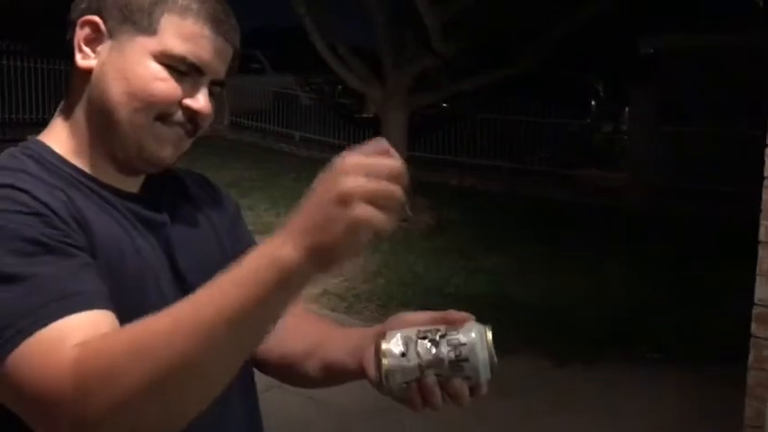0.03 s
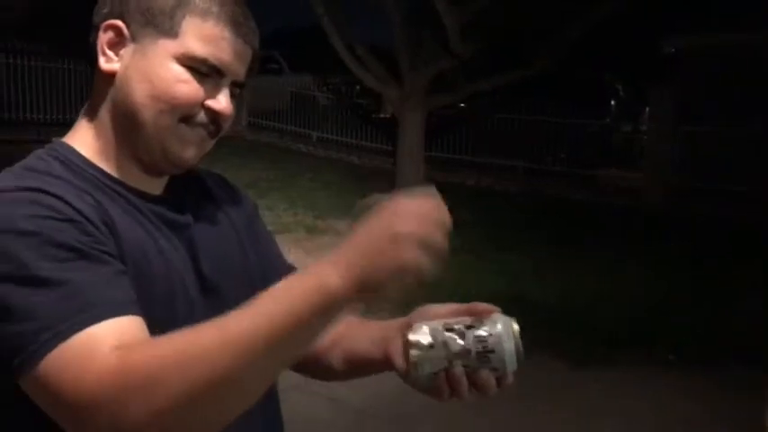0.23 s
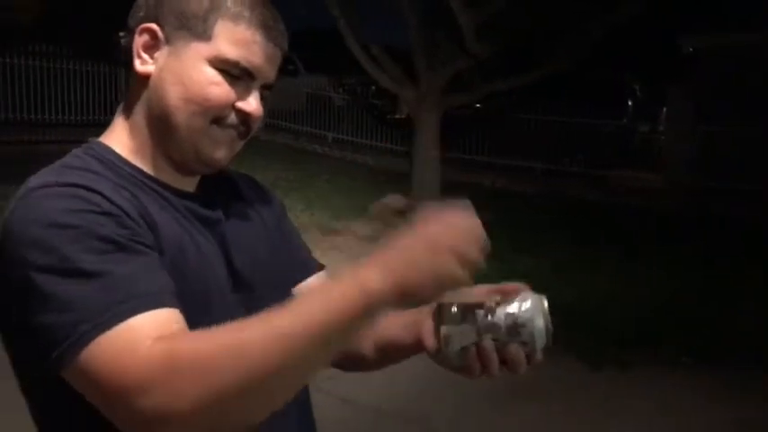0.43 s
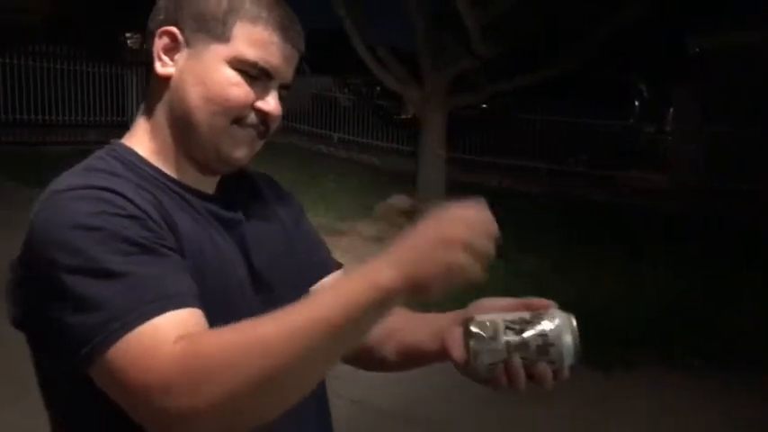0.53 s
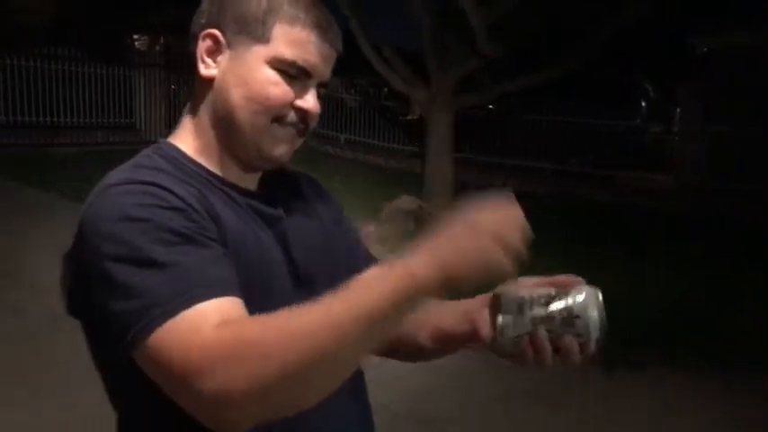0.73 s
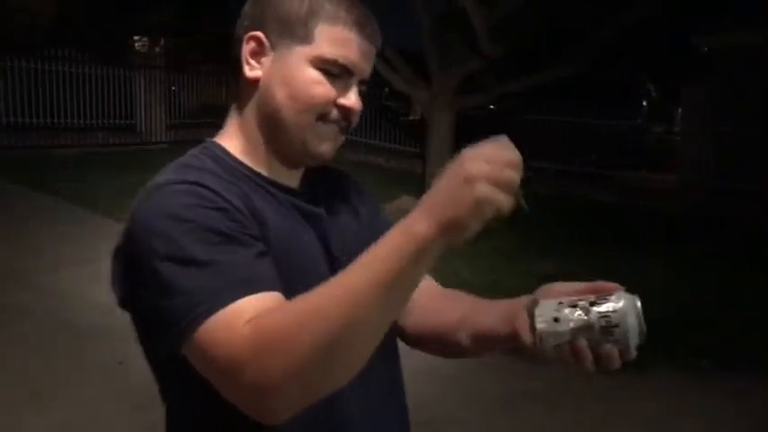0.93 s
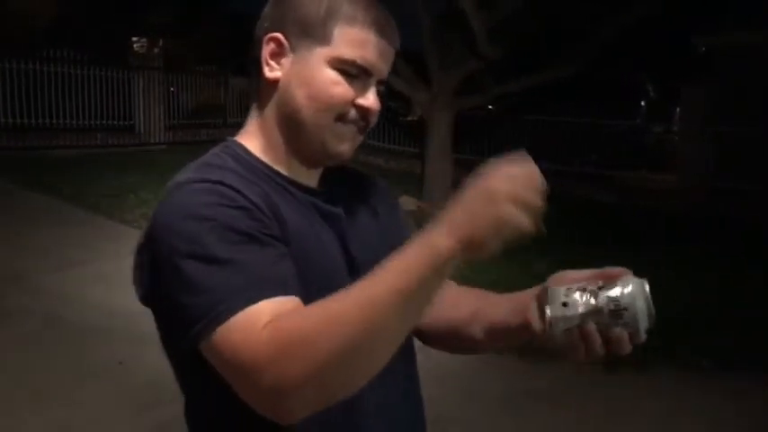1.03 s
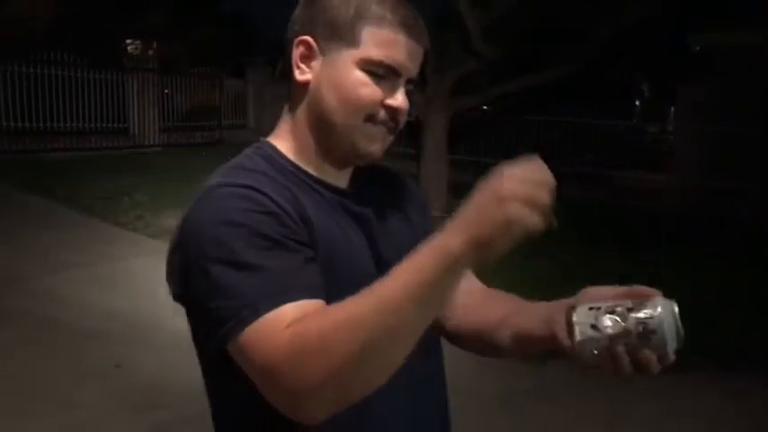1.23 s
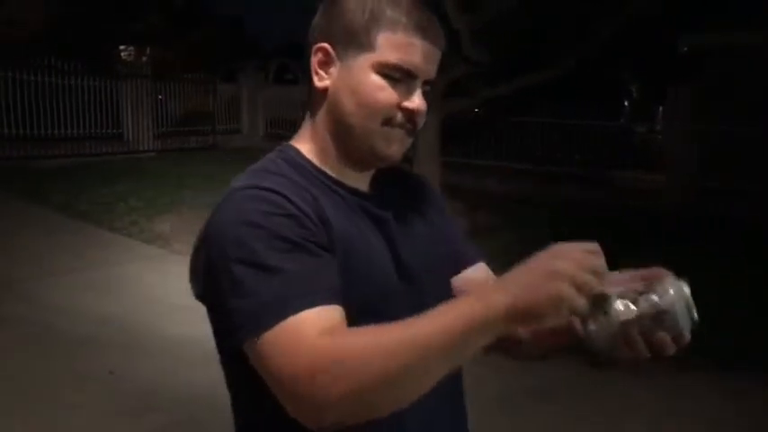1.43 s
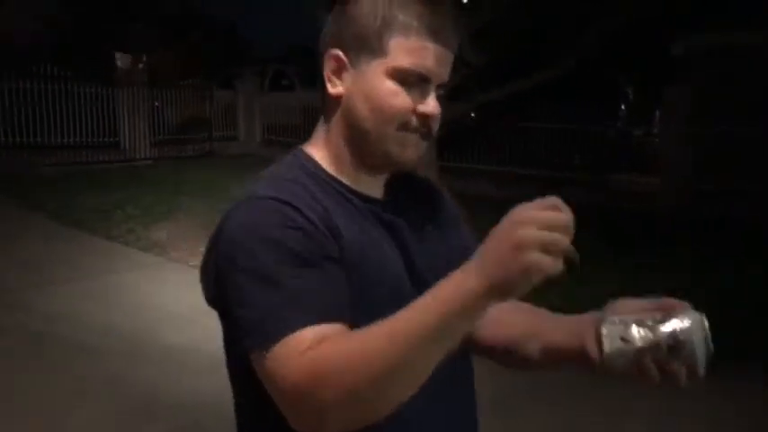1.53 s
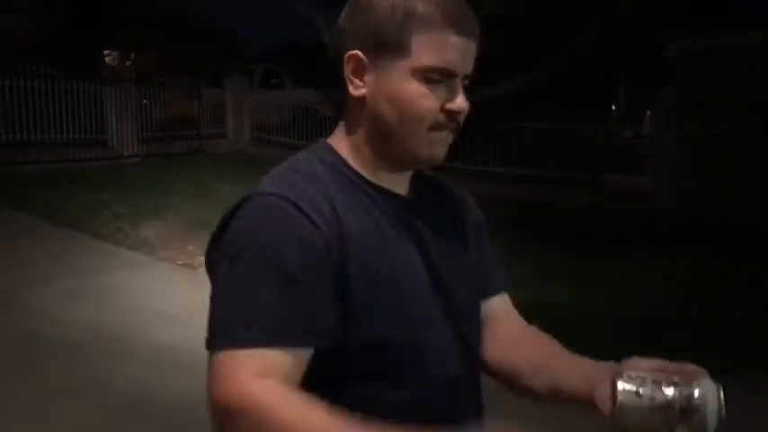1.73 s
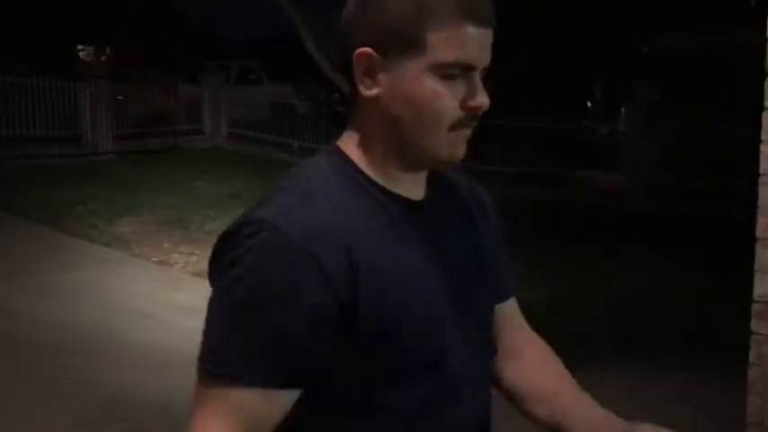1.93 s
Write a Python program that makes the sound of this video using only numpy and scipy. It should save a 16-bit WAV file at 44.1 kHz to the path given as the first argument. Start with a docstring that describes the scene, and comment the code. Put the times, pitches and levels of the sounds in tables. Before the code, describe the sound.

A fist hits an empty aluminium can five times with sharp, crunching metallic cracks.

```python
"""A low, distant hum fills a yard at night, and skin rubs on an empty aluminium can held in one hand.
The other fist strikes the can five times, four of them with a dull thud. Each blow buckles the thin
wall in a quick run of snaps that set it ringing, and the dents pop back as the fist lifts.
The yard adds a short echo. The hand shifts before the fifth blow; after it, one last dent clicks
out alone, and the hand shifts faintly once more."""
import sys
import numpy as np
from scipy import signal
from scipy.fft import rfft, irfft
from scipy.io import wavfile
from scipy.ndimage import uniform_filter1d

SR = 44100
rng = np.random.default_rng(int(sys.argv[2]) if len(sys.argv) > 2 else 0)


def master(y):
    """Save y as 16-bit WAV."""
    cut = np.clip(np.atleast_2d(y).T, -1, 1)
    pcm = np.round(cut * 32767)  # scale
    wavfile.write(sys.argv[1], SR, pcm.astype(np.int16))


N = 88200

# Colour of the night air: f/Hz, relative level/dB
AIR_COLOUR = [(15, -60), (27, -30), (44, -6), (65, 0), (105, -1), (160, -6), (300, -13), (450, -18),
              (760, -18), (1400, -26), (2000, -30.5), (3700, -35.5), (7000, -37.5), (9000, -41),
              (14000, -42.5), (16000, -47)]
# Tones of the distant hum: f/Hz, level/dB
HUM_TONES = [(59.2, -57.5), (76, -62), (97.5, -51.5), (120, -59.5), (182, -61.5), (245, -66), (301, -68.5)]
# The hand shifts on the can: t/s, length/s, level/dB
SKIN_RUBS = [(0.0, 0.043, -55.5), (1.413, 0.062, -49), (1.887, 0.061, -70.5)]
# The fist lands: t/s, level/dB, centre f/Hz
FIST_THUDS = [(0.205, -33.5, 241.7), (.840, -25.5, 597), (1.167, -31.5, 445), (1.477, -26, 499)]
# One row per buckle of the wall: t/s, level/dB, fade time/s, shimmer/dB, body/dB, treble/dB,
# the dent's low note f/Hz, its level/dB, its high note f/Hz, its level/dB, bite around that note/dB
WALL_BUCKLES = [ (0.2056, -14, 0.00977, -6.5, 1.5, -1.5, 735, -9.5, 3200, -16, 6),
                (.2115, -16, 0.0066, -12, 5.5, 0.5, 1094, -11.5, 2720, -6.5, -22),
                (0.22, -22, 0.0031, -17.5, 9, -1.5, 1420, -8, 3080, -11, 2),
                (.2280, -18, 0.0078, -17, 11, 1, 1841, 4, 3086, -1, -4),
                (.2405, -29, 0.0024, -24, 0, -9, 1301, 10, 3750, -12, 11),
                (0.2533, -23.5, 0.0027, -18, 5, 6, 930, -4, 3020, -1, 2),
                (.2590, -14, 0.0049, -18.5, -2, 3, 1666, -11, 3546, -2.5, 5),
                (0.5399, -17.5, 0.0063, -11, 4.5, -6, 775, -12, 2180, -21, -2.5),
                (.5440, -11.5, 0.0067, -11, -3, -4.5, 1445, -10, 3088, -8.5, -6),
                (0.575, -35.5, 0.0071, 5, 10, -3.5, 1020, -13, 3670, -8, -4.5),
                (.5860, -15, 0.0034, -21.5, -7, -2, 1825, 0, 3160, -6, 7),
                (.5885, -17.5, 0.0029, -9.5, 0, 5.5, 1630, -7, 3650, 2, 8),
                (0.604, -36, 0.0076, -10.5, 1.5, 6, 1900, 2, 5570, 8.5, -1.5),
                (0.8396, -15.5, 0.0079, -17, 6, 2.5, 754, -3, 3530, -19, 4),
                (.8420, -20, 0.0041, -6.5, 5.5, 4.5, 1422, 3, 4360, -5.5, 2.5),
                (.8510, -13, 0.0077, -4.5, -10, -3, 1795, -14, 3070, -7, -6),
                (.8590, -17.5, 0.007, -15, -0.5, -10, 1683, -1.5, 3260, -7, 3.5),
                (0.8874, -23, 0.0024, -18, 0, -8.5, 803, -1.5, 3960, -8, 5),
                (.8980, -25.5, 0.009, -16, 10.5, 1, 720.8, 2, 4200, -19.5, 11.5),
                (.9085, -17.5, 0.0057, -4.5, -3.5, 0, 1017, -8, 4507, -6, 1),
                (0.9143, -19.5, 0.0063, -17, -2.5, -3.5, 852, -1, 3180, -23.5, -5),
                (1.1666, -11, 0.0059, -0.5, 0, -2, 1057, -8.5, 4000, -4.5, -0.5),
                (1.1813, -18, 0.017, -12.5, 0, -11.5, 1773, 2, 3136, -6, -6),
                (1.2208, -17, 0.0024, -12, -9, 5, 822, -7.5, 4070, -17, 1),
                (1.2368, -21.5, 0.0069, -22, -4.5, -3.5, 824.4, -14, 4655, -4.5, 12.5),
                (1.2439, -26, 0.0069, -22, -6, -4.5, 1091, -15.5, 4040, -9, 0),
                (1.4767, -15, .006, -9, -4, 5, 812, -10, 4502, 1, 5.5),
                (1.4815, -18.5, 0.0026, 1.5, 10.5, 1.5, 1320, -30.5, 3142, -6, 14.5),
                (1.4925, -15, 0.0092, 0, -5.5, -6, 1368, 1, 4440, -4.5, -3),
                (1.524, -16, 0.0013, -11, 2.5, 1.5, 861, -1.5, 4290, -21, 11),
                (1.5386, -27.5, 0.0075, -10, -1, 7.5, 803, -0.5, 4090, 3.5, 3),
                (1.5505, -31.5, 0.0068, -23.5, 3.5, -25.5, 3390, 7.5, 4510, -19.5, 9),
                (1.5603, -33.5, 0.0026, -21, -17, 3.5, 3380, -18, 4283, 1, 21.5)]
# Colour of a snap: f/Hz, relative level/dB
SNAP_COLOUR = [(100, -35), (300, -32.5), (430, -16.5), (600, -12), (745, 1), (1100, 1), (1800, 3),
               (2350, 0), (3200, 4), (4300, 1), (5100, -2), (5700, 1), (7000, -1.5), (10300, -5),
               (12500, -3), (16000, -7.5)]
# Notes the can rings at: f/Hz, relative level/dB, ring time/s (the time to fade by 60 dB)
CAN_NOTES = [(554.6, -22.5, 0.098), (762, -10, 0.1), (847, -20, 0.16), (1006, -24, 0.225),
             (1100, -7.5, 0.069), (1340, -12.5, 0.053), (1684, -15, 0.099), (1838, -18, 0.12),
             (2820, -27.5, .1), (2940, -27.5, 0.079), (3220, -11, 0.065), (3400, -18, 0.098),
             (3690, -13.5, 0.08), (4030, -11, 0.097), (4540, -21, 0.052), (5480, -15, .11),
             (5750, -13.5, .11)]
# How long the yard echoes at each pitch: f/Hz, ring time/s
YARD_FADES = [(300, 0.16), (900, 0.16), (2000, 0.23), (4500, 0.18), (9000, 0.21), (15000, 0.12)]
# Notes of the last dent: f/Hz, relative level/dB, ring time/s
CLICK_NOTES = [(961.3, -20.5, 0.065), (1426, -21, .015), (1735, -19, 0.038), (2230, -25, 0.041),
               (3425, -6.5, .025), (3950, 0, 0.013), (4800, -7, 0.012), (6150, -8, .012),
               (6840, -1.5, 0.008), (8560, -20, 0.0104)]


def amp(db):
    """Turns decibels into a number to multiply a sound by."""
    return 10 ** (np.asarray(db) / 20)


def evened(x):
    """Scales a signal to an average power of 1."""
    return x / np.sqrt(np.mean(x ** 2) + 1e-20)


def read(points, hz):
    """Reads between the rows of a table, with pitch spaced in octaves."""
    f, value = np.transpose(points)
    return np.interp(np.log(hz + 1), np.log(f + 1), value)


def add(mix, start_s, sound):
    """Mixes a sound in at its start time."""
    part = mix[max(round(start_s * SR), 0):][:len(sound)]
    part += sound[:len(part)]


def band_noise(edges_hz, size):
    """Noise of power 1 between two frequencies."""
    band = signal.butter(2, edges_hz, "band", fs=SR, output="sos")
    return evened(signal.sosfilt(band, rng.standard_normal(size)))


def coloured(x, db):
    """Turns each frequency up or down by db, without smearing the sound back in time."""
    log_gain = np.log(amp(np.r_[db, db[-2:0:-1]]))
    return irfft(rfft(x) * np.exp(np.conj(signal.hilbert(log_gain)))[:len(db)])


def night_air(level_db=-49.5, flicker_db=2):
    """Distant rumble and faint hiss, flickering a little in patches of pitch and time."""
    frames, hz = N // 512 + 5, np.fft.rfftfreq(2048, 1 / SR)
    real, imag, patches = rng.standard_normal((3, len(hz), frames))
    patches = evened(uniform_filter1d(uniform_filter1d(patches, size=16, axis=0), size=8, axis=1))
    spectrum = (real + 1j * imag) * amp(read(AIR_COLOUR, hz)[:, None] + flicker_db * patches)
    return amp(level_db) * evened(signal.istft(spectrum, nperseg=2048, noverlap=1536)[1][:N])


def distant_hum(waver=.71, waver_hz=7.3):
    """Low tones, each made to waver by noise close to its own pitch."""
    out, t = np.zeros(N), np.arange(N) / SR
    for hz, db in HUM_TONES:
        tone = np.sin(2 * np.pi * (hz * t + rng.random()))
        out += amp(db) * evened(tone + waver * band_noise((hz - waver_hz, hz + waver_hz), N))
    return out


def skin_rubs(band_hz=(1775, 4760)):
    """Skin slides on the can with a soft, brief hiss."""
    out = np.zeros(N)
    for start_s, length_s, db in SKIN_RUBS:
        swell = signal.windows.tukey(int(length_s * SR), .5)
        add(out, start_s, amp(db) * swell * band_noise(band_hz, len(swell)))
    return out


def fist_thuds(peak_s=.0045, spread=1.15):
    """The dull push of the fist: low noise that swells fast and dies away."""
    out, t = np.zeros(N), np.arange(SR // 10) / SR
    swell = t / peak_s * np.exp(1 - t / peak_s)
    for start_s, db, hz in FIST_THUDS:
        add(out, start_s, amp(db) * swell * band_noise((hz / spread, hz * spread), len(t)))
    return out


def snap_run(t, fade_s, shimmer_db, snaps_per_s=1400, spread_db=3):
    """A dying run of snaps crosses the wall; a crowd of high notes shimmers on after each."""
    snap_s, shimmer_s, rise_s = .001, .013, .0007
    size, fade = len(t), np.exp(-t / fade_s)
    happens = rng.random(size) < snaps_per_s / SR
    snaps = happens * amp(spread_db * np.clip(rng.standard_normal(size), -2, 2))
    snaps[0] = amp(spread_db)
    one_snap = np.exp(-2 * t / snap_s) / snap_s
    shimmer = amp(shimmer_db) ** 2 * np.exp(-2 * t / shimmer_s) / shimmer_s
    power = abs(signal.fftconvolve((snaps * fade) ** 2, one_snap + shimmer)[:size])
    crack = np.sqrt(power) * (1 - np.exp(-t / rise_s)) * rng.standard_normal(size)
    return evened(crack) * np.sqrt(np.mean(fade ** 2))


def ringing(notes, t, blur_share=.014, blur_at_hz=1500):
    """Dying notes whose pitch trembles as the thin wall keeps shifting."""
    out = np.zeros(len(t))
    for hz, db, ring_s in notes:
        blur_hz = hz * blur_share * min(hz / blur_at_hz, 2)  # low notes ring cleaner
        drift = np.cumsum(rng.standard_normal(len(t))) * np.sqrt(2 * np.pi * blur_hz / SR)
        drift = uniform_filter1d(drift, size=130)
        out += amp(db - 60 * t / ring_s) * np.sin(2 * np.pi * (hz * t + rng.random()) + drift)
    return out


def buckle(fade_s, shimmer_db, body_db, treble_db, low_hz, low_db, high_hz, high_db, bite_db, size=8192):
    """The wall gives way with a crack that rings the whole can and the dented patch."""
    crack_db, can_db, dent_db = 7, -2, 7
    bite_octaves, detune = .22, .0067
    rise_s, build_up_s, dent_ring_s = .00074, .008, .07
    t, hz = np.arange(size) / SR, np.fft.rfftfreq(size, 1 / SR)
    tilt = [(1710, body_db), (2770, 0), (4470, 0), (6900, treble_db)]  # f/Hz, level/dB
    bite = bite_db * np.exp(-(np.log2((hz + 1) / high_hz) / bite_octaves) ** 2)
    colour = read(SNAP_COLOUR, hz) + read(tilt, hz) + bite + crack_db
    crack = coloured(snap_run(t, fade_s, shimmer_db), colour)
    # each dent puts the can slightly out of tune
    notes = [(f * (1 + detune * rng.uniform(-.99, 1)), db + can_db + read(tilt, f), ring_s)
             for f, db, ring_s in CAN_NOTES]
    notes += [(low_hz, low_db + dent_db, dent_ring_s), (high_hz, high_db + dent_db, dent_ring_s)]
    build_up = np.sqrt(fade_s / (fade_s + build_up_s))  # a longer run of snaps rings louder
    return crack + build_up * ringing(notes, t) * (1 - np.exp(-t / rise_s))


def yard_echo(sound, level_db=-14, delay_s=.006):
    """Sound bounces around the yard, each pitch dying at its own speed."""
    bounces = rng.standard_normal(SR // 2) * (rng.random(SR // 2) < .1)
    hz, t, spectrum = signal.stft(bounces, SR, nperseg=256)
    fade = amp(-60 * t / read(YARD_FADES, hz)[:, None])
    tail = signal.istft(spectrum * fade, SR, nperseg=256)[1]
    out = np.zeros(N)
    add(out, delay_s, signal.fftconvolve(sound, tail / np.linalg.norm(tail)))
    return amp(level_db) * out


def last_click(level_db=-8.5, rise_s=.00018, hiss_db=-7, hiss_s=.0031, hiss_hz=(910, 13700)):
    """One small dent pops out by itself: a single snap with short, bright notes."""
    t = np.arange(SR // 10) / SR
    tones = ringing(CLICK_NOTES, t)
    hiss = amp(hiss_db) * np.exp(-t / hiss_s) * band_noise(hiss_hz, len(t))
    return amp(level_db) * (tones + hiss) * (1 - np.exp(-t / rise_s))


def scene():
    """The can and hands in the yard at night."""
    can = np.zeros(N)
    for start_s, db, *shape in WALL_BUCKLES:
        add(can, start_s, amp(db) * buckle(*shape))
    add(can, start_s=1.7091, sound=last_click())
    near = can + fist_thuds() + skin_rubs()
    return (near + yard_echo(near) + night_air() + distant_hum())[None]


def record(dry):
    """Volume control dips at each crack and creeps back; peaks are rounded and the top treble is cut."""
    dip_from_db, dip_share, recover_db_per_s = -26.5, .17, 35
    boost_db, ceiling, top_hz = 3, 1.05, 15950
    power_db = 10 * np.log10(abs(uniform_filter1d(dry[0] ** 2, size=300)) + 1e-12)
    fall = np.arange(N) / SR * recover_db_per_s
    held_db = np.maximum.accumulate(power_db + fall) - fall  # jumps to each peak, then sinks
    dipped = dry * amp(boost_db - dip_share * np.maximum(held_db - dip_from_db, 0))
    rounded = dipped / (1 + (dipped / ceiling) ** 4) ** .25
    treble_cut = signal.firwin(301, top_hz, window=("kaiser", 8), fs=SR)
    return signal.oaconvolve(rounded, treble_cut[None], "same")


dry = scene()
out = record(dry)
master(out)
```